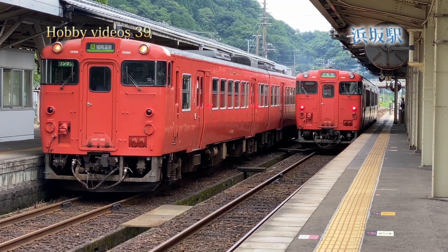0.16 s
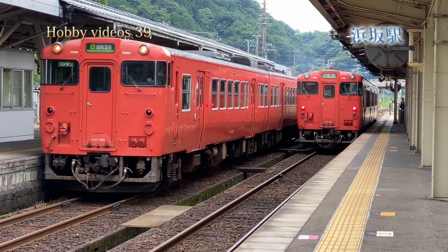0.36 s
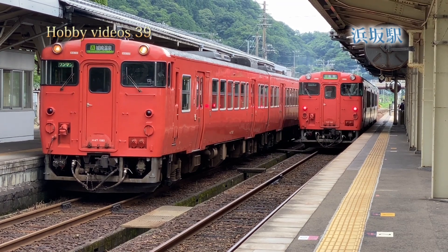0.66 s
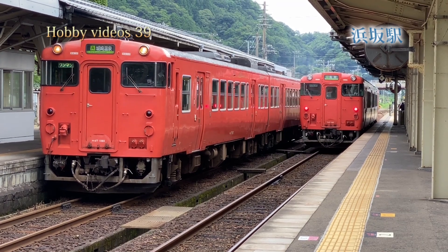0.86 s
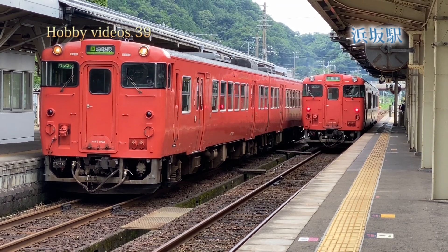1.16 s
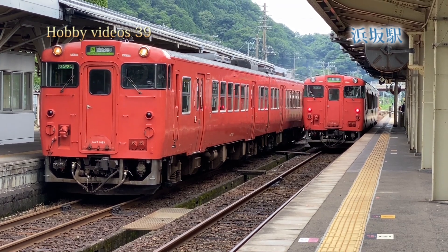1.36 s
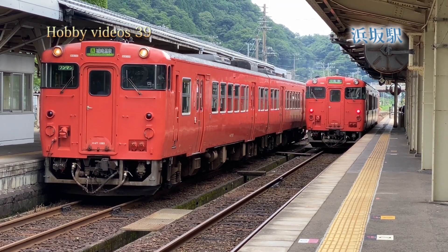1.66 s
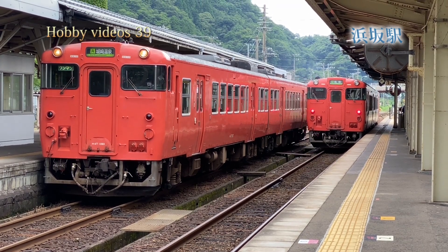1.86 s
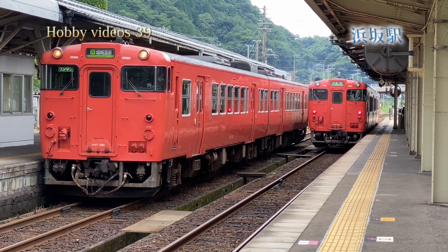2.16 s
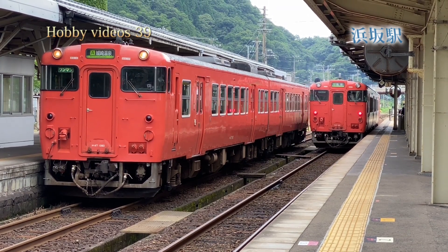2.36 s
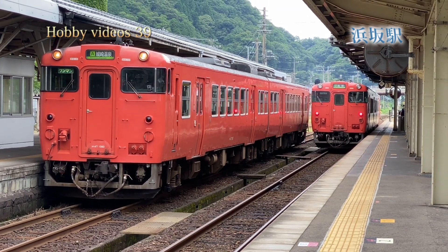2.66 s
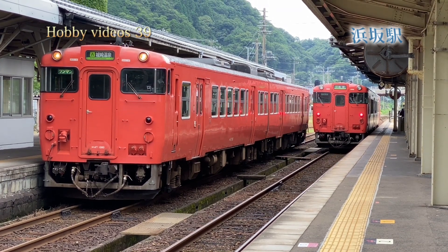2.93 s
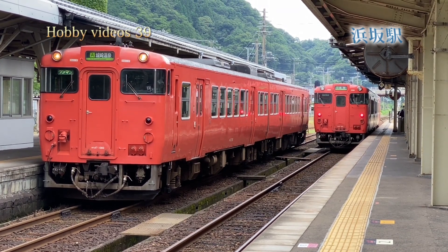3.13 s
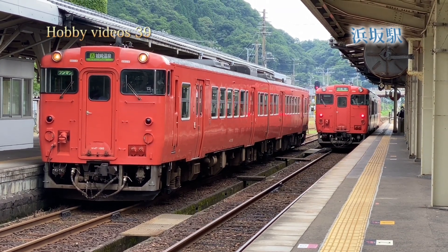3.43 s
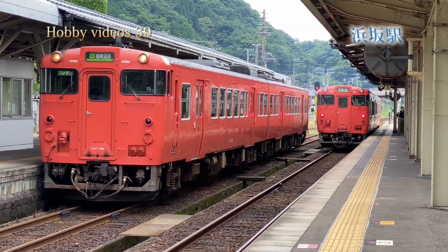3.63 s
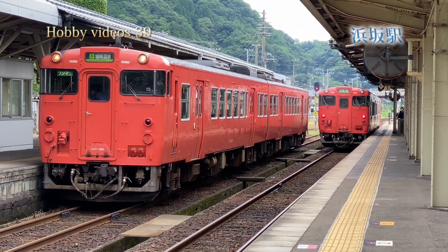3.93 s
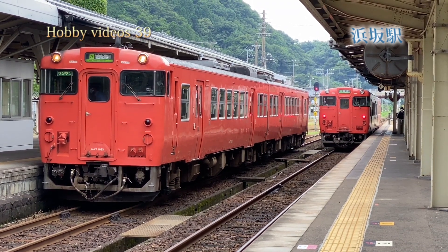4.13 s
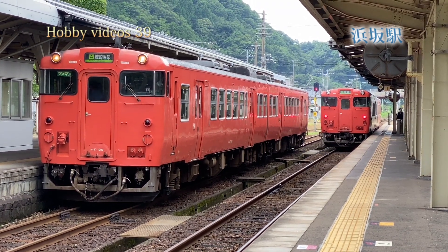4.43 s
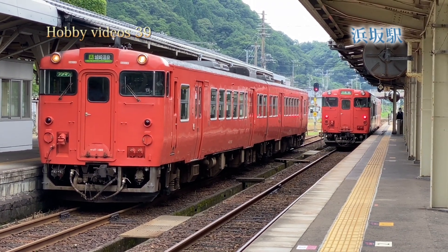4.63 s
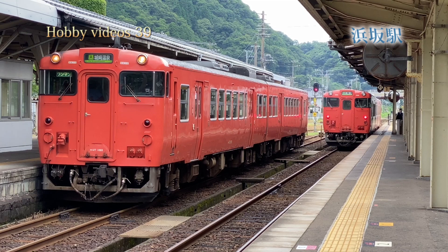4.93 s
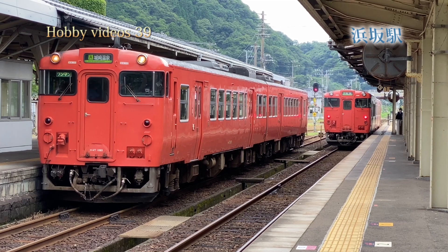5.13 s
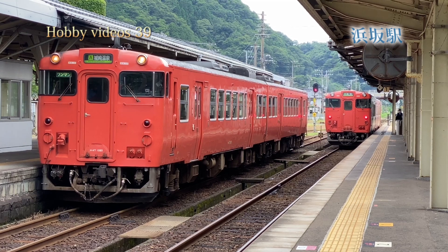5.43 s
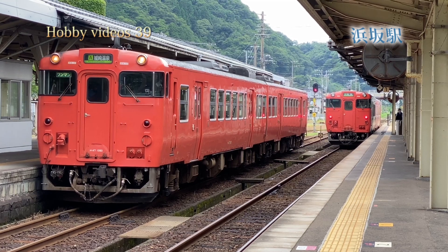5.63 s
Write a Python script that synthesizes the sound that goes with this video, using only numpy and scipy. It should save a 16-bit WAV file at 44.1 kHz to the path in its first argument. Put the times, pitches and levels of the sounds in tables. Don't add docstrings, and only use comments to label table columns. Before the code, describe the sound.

At a covered railway platform, a nearby diesel railcar idles with a steady low hum. Engines of a leaving train run at almost the same pitch, so the drone beats slowly. Around three seconds they rev up, the pitch climbs, and thin breathy turbine whistles rise above dull mechanical roar and air hiss. Stereo microphone a few steps away.

```python
import sys
import numpy as np
from scipy import signal
from scipy.fft import rfft, irfft
from scipy.io import wavfile
from scipy.ndimage import uniform_filter1d

SR = 44100
rng = np.random.default_rng(int(sys.argv[2]) if len(sys.argv) > 2 else 0)


def to_linear_factor(level_db):
    exponent = np.asarray(level_db, float) / 20
    return 10 ** exponent


def transcribe(u):
    v = np.clip(np.atleast_2d(u).T, -1, 1)
    q = np.round(v * 32767).astype(np.int16)
    wavfile.write(sys.argv[1], SR, q)


N = 255339
TIME = np.arange(N) / SR


def column(table, index):
    rows = np.array(table)
    return np.interp(TIME, rows[:, 0], rows[:, index])


def swell(table, index):
    rows = np.array(table)
    return np.sqrt(2) * np.interp(TIME, rows[:, 0], to_linear_factor(rows[:, index]), left=0)


def turn(hz):
    return 2 * np.pi * np.cumsum(hz) / SR


def across(points):
    rows = np.array(points)
    bin_hz = np.arange(1, N // 2 + 2) * SR / N
    return np.interp(np.log(bin_hz), np.log(rows[:, 0]), rows[:, 1])


def level(x, db):
    return x * to_linear_factor(db) / np.sqrt(np.mean(x ** 2))


def walk(rate):
    coarse = np.repeat(rng.standard_normal(int(N / SR * rate) + 2), 8)
    for _ in range(2):
        coarse = uniform_filter1d(coarse, size=8)
    return np.interp(TIME * rate * 8, np.arange(len(coarse)), coarse)


def whistle(table, spread_hz):
    lowpass = signal.butter(4, spread_hz, fs=SR, output="sos")
    slow = signal.sosfilt(lowpass, rng.standard_normal(N))
    return swell(table, index=2) * level(slow, 0) * np.sin(turn(column(table, index=1)))


# (frequency [Hz], share [-1 to 1])
LAG_SHARE = [(1500, 0.019), (2600, .85), (4800, .8), (5400, 0), (5900, -.8), (6500, 0), (7700, 0),
             (8200, .95), (9200, .95), (10300, .9), (12000, -.6), (14500, .6)]
# (frequency [Hz], width [Hz], level [dB])
CAR_PANELS = [(369, 15, -11), (440, 19, -2.5), (585, 54, 2), (773, 19, 2.5), (940, 37, -0.5), (1040, 69, 2),
              (1207, 54, 2), (1270, 68, -2.5), (1510, 74, 1.5), (1570, 47, -1), (1900, 67, 1.5),
              (1970, 31, 2.5), (3620, 40, -2)]


def ports(source, colour, side_colour, mid_db, side_db):
    wave = rfft(source)
    diffuse = rfft(rng.standard_normal(N) * source.std())
    share = np.clip(across(LAG_SHARE), -1, 1)
    hz = np.arange(N // 2 + 1) * SR / N
    panel_db = sum(db * np.exp(-((hz - centre) / width) ** 2) for centre, width, db in CAR_PANELS)
    mid = irfft(wave * to_linear_factor(across(colour) + panel_db), N)
    side_wave = 1j * share * wave + np.sqrt(1 - share ** 2) * diffuse
    side = irfft(side_wave * to_linear_factor(across(side_colour)), N)
    return level(mid, mid_db) + level(side, side_db) * np.array([[1], [-1]])


# (frequency [Hz], level [dB per Hz])
RUMBLE_COLOUR = [(22, -22), (32, -6), (42, -14), (50, 15), (68, 16), (90, 13), (130, 9), (170, -3.5),
                 (240, -33), (700, -140)]


def ground_rumble():
    rumble = irfft(rfft(rng.standard_normal(N)) * to_linear_factor(across(RUMBLE_COLOUR)), N)
    return level(rumble, -41.0) * to_linear_factor(1.5 * walk(4))


# (frequency [Hz], level [dB per Hz])
HISS_COLOUR = [(3400, -27), (5800, -27), (6400, -6), (7750, 4.5), (8600, -4.5), (9300, -11), (11900, -17),
               (12450, -27), (12900, -40), (13700, -42), (14400, -19), (15720, -22), (15850, -90)]
HISS_SIDE_COLOUR = [(5550, -60), (5750, -8.5), (6290, -23), (6580, -60), (7400, -58), (7650, -11),
                    (7850, -7), (8290, 4), (10300, -22), (10600, -60), (11500, -58), (11800, -21),
                    (15100, -20.5), (15250, -90)]


def air_hiss():
    jet = rng.standard_normal(N) * to_linear_factor(0.5 * walk(4.5))
    fade_db = -1.6 * np.clip(TIME - 3.2, 0, None) / 3.6
    return ports(jet, HISS_COLOUR, HISS_SIDE_COLOUR, mid_db=-50.5, side_db=-53.5) * to_linear_factor(fade_db)


# (time [s], centre [Hz], level [dB])
GEAR_THIRD_BAND = [
    (3.0, 6650, -78),
    (4.0, 6730, -63),
    (4.5, 6730, -60.5),
    (5.2, 6740, -57.5),
    (5.79, 6750, -60),
]


def gear_third_harmonic():
    return whistle(GEAR_THIRD_BAND, spread_hz=90.0) + whistle(GEAR_THIRD_BAND, spread_hz=420.0)


# (time [s], level [dB])
IDLE_FIRING = [
    (0, -27.2),
    (3.0, -27.4),
    (3.6, -26.6),
    (5.79, -27.2),
]
# (quarter steps of the firing rate, level [dB])
IDLE_HUM = [(3, -50), (10, -55), (20, -54), (22, -58), (27, -56), (31, -59), (44, -53), (52, -55),
            (58, -57), (60, -55), (63, -56), (68, -58), (111, -63), (175, -68), (214, -69)]


def idling_car(phase):
    firing = np.sqrt(2) * to_linear_factor(column(IDLE_FIRING, index=1)) * np.cos(phase)
    hum = sum(np.sqrt(2) * to_linear_factor(db - 2.0 + 3.0 * walk(4)) * np.sin(step * phase / 4 + 1.5 * walk(6))
              for step, db in IDLE_HUM)
    return firing + hum


# (frequency [Hz], level [dB per Hz])
BLOCK_COLOUR = [(100, -19), (170, 2.5), (222, -3.5), (254, -2.5), (286, -2), (328, 0), (428, -2.5),
                (755, -1), (1050, -3.5), (1290, -8), (1900, -8), (2530, -13), (3510, -14.5), (4260, -23),
                (6000, -24), (7800, -52), (13200, -120)]
BLOCK_SIDE_COLOUR = [(40, -1.5), (100, 3.5), (136, -7), (209, -10), (332, -7), (594, -3), (1030, -1.5),
                     (1840, -26), (2150, -29), (2380, -22.5), (3020, -17.5), (5200, -29.5), (5500, -60),
                     (7000, -70)]
# (time [s], level [dB], brightness [dB])
ROAR_LOAD = [
    (0, 4, -3),
    (1, 2.5, -0.8),
    (2, 2, -1),
    (3, 3.5, -2.35),
    (4, 2.6, -1.5),
    (5, 1.8, -1.1),
    (5.79, 1.5, -1),
]


def clatter(phases):
    bursts = sum((1 + 0.066 * np.cos(phase)) * rng.standard_normal(N) for phase in phases)
    uneven = bursts * to_linear_factor(0.23 * walk(9))
    roar = ports(uneven, BLOCK_COLOUR, BLOCK_SIDE_COLOUR, mid_db=-38.0, side_db=-44.5)
    load_db, bright_db = column(ROAR_LOAD, index=1), column(ROAR_LOAD, index=2)
    low = signal.sosfilt(signal.butter(2, 1400, fs=SR, output="sos"), roar)
    high = roar - low
    tilted = low + high * to_linear_factor(bright_db - bright_db.mean())
    return to_linear_factor(load_db - load_db.mean()) * tilted


# (time [s], centre [Hz], level [dB])
FRONT_TURBINE = [
    (2.7, 4500, -74),
    (3.3, 4870, -66),
    (3.7, 5120, -66),
    (4.2, 5420, -66),
    (4.9, 5750, -65.5),
    (5.4, 5900, -71),
    (5.79, 6000, -80),
]
REAR_TURBINE = [
    (3.3, 5500, -85),
    (3.6, 5620, -69),
    (4.0, 5750, -76),
    (4.7, 6150, -74),
    (5.1, 6300, -64),
    (5.5, 6420, -65),
    (5.79, 6500, -69),
]


def turbine_whines():
    return whistle(FRONT_TURBINE, spread_hz=29.0) + whistle(REAR_TURBINE, spread_hz=73.0)


def overtones(phase, db):
    rungs = 0
    for order in [k / 2 for k in range(5, 30) if k != 7]:
        fading = to_linear_factor(1.5 * rng.standard_normal() + 5.0 * walk(7))
        rungs = rungs + fading * np.sin(order * phase + 2.5 * walk(8))
    return np.sqrt(2) * to_linear_factor(db) * rungs


# (sixths of the firing rate, resonance [Hz], half width [Hz], level [dB])
FRONT_RINGING = [(7, 78, 2, -45), (9, 110.8, 1, -42.5), (9, 113.3, .6, -36), (9, 114.3, .5, -40),
                 (9, 115.9, .5, -44), (11, 136.5, 2, -49), (15, 167.5, 1, -51), (15, 184, 3, -54),
                 (18, 206, 5, -50), (18, 221, 5, -57), (54, 597, 6, -52), (68, 750, 12, -51),
                 (20, 253.5, 2.5, -52), (21, 254, 6, -43.5), (21, 265, 2, -57), (21, 238, 6, -57),
                 (176, 2200, 8, -63), (176, 2218, 8, -50.5), (176, 2242, 6, -58), (176, 2260, 8, -61)]
REAR_RINGING = [
    (22, 252.5, 3.5, -51),
    (18, 209.5, 1.5, -57),
    (66, 758, 9, -50),
]


def resonant_orders(speed, phase, table):
    firing_hz = column(speed, index=1)
    ringing = 0
    for step, centre, width, db in table:
        detune = (step / 6 * firing_hz - centre) / width
        strength = to_linear_factor(db - 6 * detune ** 2 + 1.0 * walk(6))
        ringing = ringing + strength * np.sin(step / 6 * phase + 0.3 * walk(8))
    return np.sqrt(2) * ringing


# (time [s], firing rate [Hz])
FRONT_RATE = [(0, 65.5), (.5, 65.86), (1, 66.07), (1.5, 66.29), (2, 66.52), (2.3, 66.62), (2.6, 67),
              (2.8, 66.72), (3, 68.68), (3.2, 71.36), (3.4, 71.51), (3.6, 72.37), (4, 73.89), (4.4, 75.17),
              (4.8, 75.75), (5.3, 76.73), (5.79, 77.29)]
REAR_RATE = [(0, 68.94), (.3, 68.54), (.6, 68.94), (1, 69.33), (1.3, 69.73), (1.6, 69.63), (2, 69.92),
             (2.4, 69.65), (2.7, 70.15), (3, 70.62), (3.25, 72.78), (3.5, 73.35), (4.1, 75.2), (4.8, 77.3),
             (5.79, 78.9)]
# (time [s], level [dB])
FRONT_TONE = [(0.0, -32.0), (0.31, -39.5), (0.61, -33.5), (0.99, -29.5), (1.13, -32.5), (1.71, -27.0),
              (1.84, -29.0), (2.37, -23.5), (2.42, -20.5), (2.78, -25.5), (3.07, -19.5), (3.23, -36.0),
              (3.8, -41.0), (4.24, -32.0), (4.72, -60.0), (4.89, -30.0), (5.37, -27.5), (5.79, -31.0)]
REAR_TONE = [(0, -30.5), (.3, -31), (.64, -39.5), (.98, -30), (1.03, -25.5), (1.44, -25), (1.81, -35.5),
             (2.15, -60), (2.46, -26.5), (2.84, -26), (2.92, -60), (3.57, -31), (3.83, -60), (5.79, -60)]
# (time [s], level [dB])
FRONT_SECOND = [(0, -41.5), (.3, -37.5), (1.2, -35), (2, -35.5), (2.4, -34), (3.1, -35), (3.19, -56),
                (5.79, -58)]
REAR_SECOND = [(0, -45), (.3, -52), (.6, -39.5), (1.2, -36), (2, -38), (2.4, -48), (3.05, -43), (4.3, -51),
               (5.79, -57)]


def exhaust(speed, firing, octave, start, octave_lead):
    phase = turn(column(speed, index=1)) + start
    fundamental = swell(firing, index=1) * np.cos(phase)
    second = swell(octave, index=1) * np.cos(2 * phase + octave_lead)
    return fundamental + second, phase


def scene():
    front, front_phase = exhaust(FRONT_RATE, FRONT_TONE, FRONT_SECOND, start=2.14, octave_lead=5.83)
    rear, rear_phase = exhaust(REAR_RATE, REAR_TONE, REAR_SECOND, start=4.03, octave_lead=4.1)
    idle_hz = 67.5465
    idle_phase = 2 * np.pi * idle_hz * TIME + 3.75
    background = ground_rumble() + air_hiss() + gear_third_harmonic()
    standing = idling_car(idle_phase)
    knock = clatter((front_phase, rear_phase, idle_phase))
    ladders = overtones(front_phase, -65.0) + overtones(rear_phase, -64.5)
    front_orders = resonant_orders(FRONT_RATE, front_phase, FRONT_RINGING)
    rear_orders = resonant_orders(REAR_RATE, rear_phase, REAR_RINGING)
    leaving = front + rear + front_orders + rear_orders + ladders + turbine_whines()
    return background + standing + knock + leaving


def top_cut(x):
    return signal.sosfilt(signal.butter(12, 17020, fs=SR, output="sos"), x)


def record(dry):
    return top_cut(dry)


dry = scene()
out = record(dry)
transcribe(out)
```